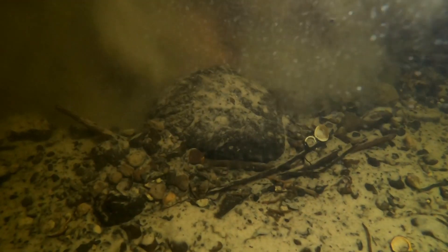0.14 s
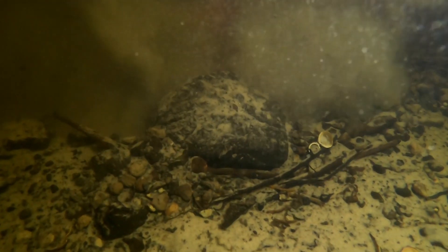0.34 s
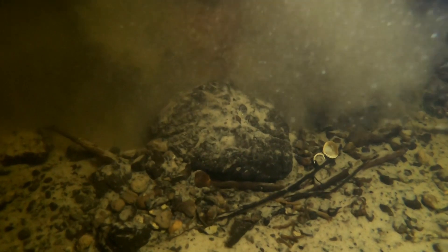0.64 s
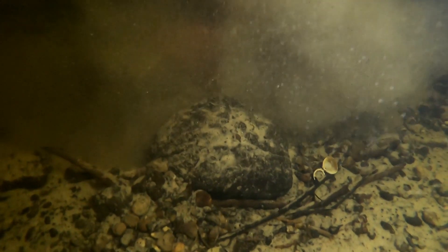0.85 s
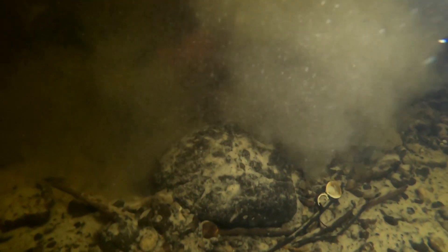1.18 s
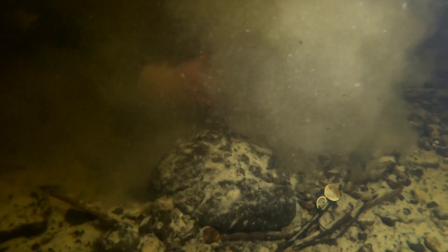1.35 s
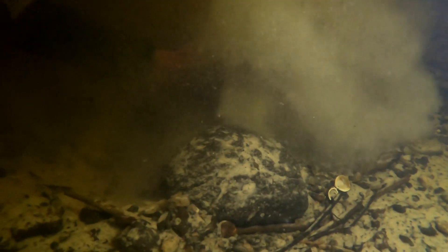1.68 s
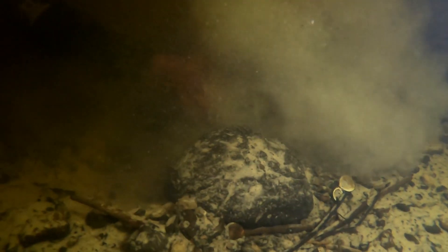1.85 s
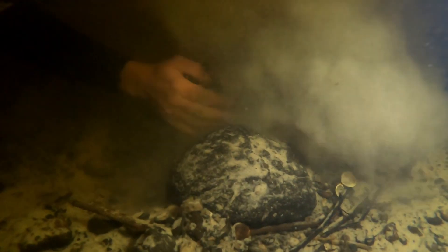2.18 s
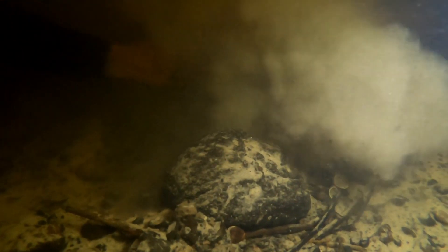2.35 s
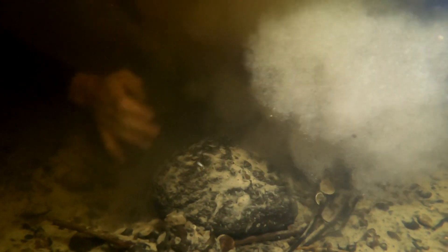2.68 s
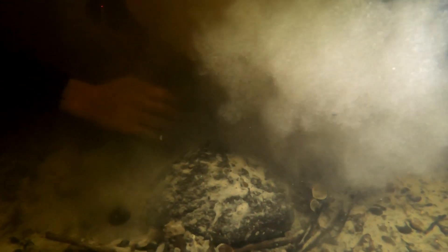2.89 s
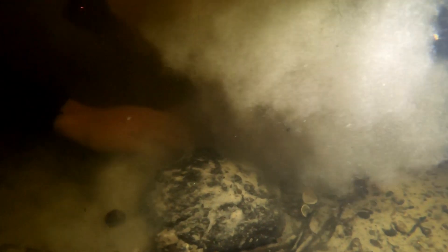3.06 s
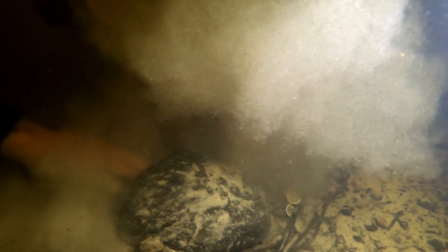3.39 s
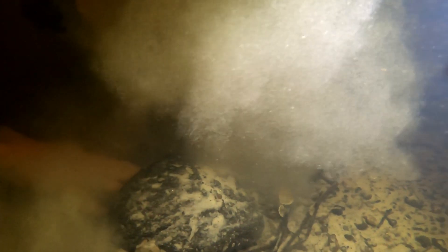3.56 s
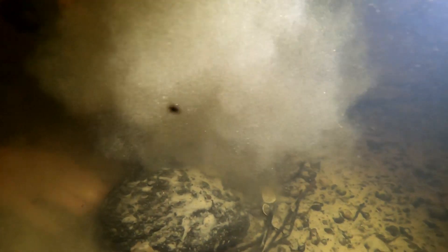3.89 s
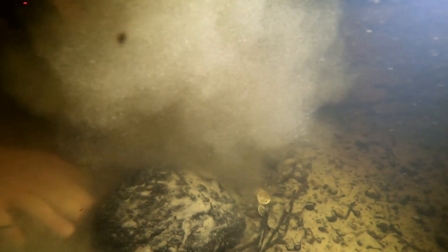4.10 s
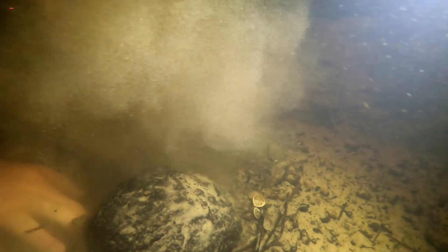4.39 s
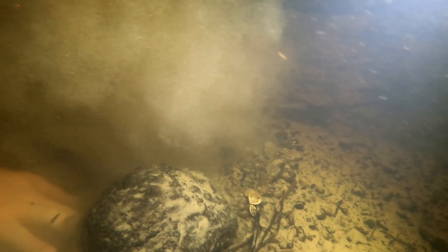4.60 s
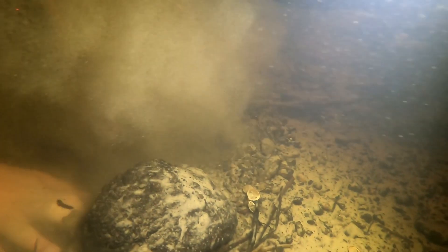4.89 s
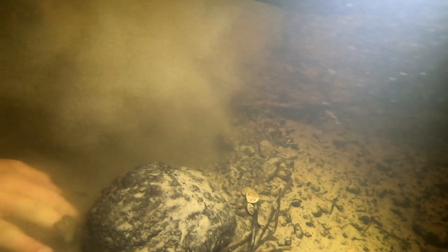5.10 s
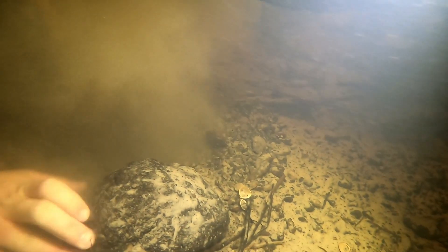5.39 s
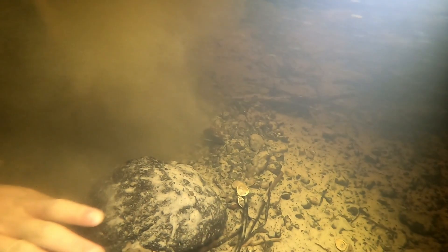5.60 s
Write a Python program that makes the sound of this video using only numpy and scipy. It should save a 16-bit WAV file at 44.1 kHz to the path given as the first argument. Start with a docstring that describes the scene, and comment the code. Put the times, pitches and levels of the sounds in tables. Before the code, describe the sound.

Close underwater sound of a hand digging in river gravel. A low water thump opens it, then busy stone knocks and pattering grit, one heavy clonk near three seconds, and sparser, softer knocks and pebble slides to the end. The microphone sits in a small housing, so everything is hollow and muffled.

```python
"""A low push of water thumps first, then stones knock and grit patters: a hand digs in river gravel
beside a small camera under water. Knocks, grains and sliding gravel are blows of chosen pitch and length
that ring the camera housing; larger stones add decaying notes, and sharp grains add puffs of treble.
Surges and wash are shaped noise, and pushes of water are short low swings.
Two microphone ports hear the housing ring out of step and the low pushes together."""
import sys
import numpy as np
from scipy import signal
from scipy.fft import rfft, irfft, next_fast_len
from scipy.io import wavfile
from scipy.ndimage import uniform_filter1d

SR = 44100
rng = np.random.default_rng(int(sys.argv[2]) if len(sys.argv) > 2 else 0)


def output_pcm(signal):
    """Save a mono or channel-first signal as 16-bit PCM at the path in sys.argv[1].

    Samples are clipped to [-1, 1] before scaling.
    """
    pcm = np.clip(np.atleast_2d(signal).T, -1, 1) * 32767
    wavfile.write(sys.argv[1], SR, np.round(pcm).astype(np.int16))


N = 253134

# Table levels are set before the ports colour the sound.
# stones knocking: (t/s, peak level/dB, centre of the blow f/Hz, contact length/ms, clack over the peak level/dB)
STONE_KNOCKS = [(0.084, -27.5, 1090, 1.3, -8), (0.2, -33, 1430, 1.47, -3), (0.4558, -44, 1640, 0.91, -10),
                (0.466, -32.5, 1490, 0.71, -27), (0.572, -37, 1740, 4.7, 4),
                (0.5868, -32.5, 1530, 0.91, 5.5), (0.6927, -42, 1480, 2.6, 5),
                (0.7914, -26.5, 1180, 1.94, -2), (0.857, -38, 1450, 2, -8), (0.9007, -20, 1460, 2.1, -10),
                (0.9439, -40.5, 1410, 1.6, 12.5), (0.961, -26.5, 1520, 1.14, -9),
                (1.116, -36, 1330, 0.72, 6), (1.125, -49, 1490, 2.6, 2), (1.3055, -29.5, 1300, 0.9, -14),
                (1.318, -39, 1400, 1.4, -5), (1.3218, -30, 1410, 1.4, -6), (1.4967, -37, 1860, 0.8, 8.5),
                (1.523, -32, 1270, 2.2, -17), (1.7272, -37, 1530, 1, 5.5), (1.8521, -31, 1030, 2.2, -15),
                (1.9834, -35, 1250, 0.43, -24), (2.269, -39.5, 1480, 2.1, 1),
                (2.494, -47.5, 1940, 0.83, 16), (2.5096, -27, 1370, 1.37, -3.5),
                (2.572, -39, 1890, 1.5, -2), (2.6065, -38, 1700, 1, -7), (2.615, -22.5, 1420, 0.8, -3.5),
                (2.6164, -27.5, 2100, 0.6, -12), (2.625, -39, 1700, 1.6, 2), (2.646, -27, 1490, 1.3, -4),
                (2.668, -28.5, 1400, 1.1, -4.5), (2.681, -34, 1410, 0.9, -12), (2.792, -43, 1310, 2.2, -19),
                (2.9998, -32, 1300, 2.4, -29), (3.069, -41, 1510, 2, 2.5), (3.15, -34.5, 1580, 0.84, -4),
                (3.259, -32, 1260, 1.1, -12), (3.5667, -37, 1070, 0.74, -23),
                (3.806, -32, 1350, 2.1, -21.5), (3.8175, -36, 1240, 9.6, -16), (3.908, -40, 1400, 2.8, -11),
                (3.941, -23.5, 1420, 1.2, -12), (4.0308, -30.5, 1610, 1.64, -11.5),
                (4.0789, -26.5, 940, 1.6, -39), (4.104, -46.5, 650, 2.7, -26),
                (4.1623, -40, 1350, 0.72, -8), (4.172, -33.5, 1427, 7.1, -20),
                (4.182, -38.5, 1080, 2.4, -3), (4.195, -33.5, 1440, 9.5, -20), (4.372, -49.5, 1380, 1.2, 4),
                (4.3763, -41.5, 1540, 0.84, -2), (4.5963, -44.5, 810, 11, -20), (4.706, -47, 810, 4.1, -28),
                (4.8005, -33, 1460, 3, -10.5), (4.818, -38.5, 1193, 4, -28), (4.937, -39.5, 1470, 5.9, -23),
                (5.105, -36, 1680, 1.86, -13), (5.295, -32.5, 1200, 0.77, -10),
                (5.3133, -36.5, 1306, 2.1, -12), (5.4277, -27, 1300, 0.77, -25),
                (5.4035, -41, 1250, 1.5, -20), (5.4327, -30.5, 900, 2.2, -32), (5.4395, -41, 1240, 6, -11),
                (5.563, -36.5, 1460, 0.75, -7.5), (5.5897, -28, 1540, 1.7, -11.5),
                (5.6543, -30.5, 1460, 1.02, -2)]
# larger stones that sound a note of their own: (t/s, peak level/dB, note f/Hz, length/ms)
STONE_NOTES = [(0.755, -21.5, 1000, 4.6), (0.785, -34, 950, 4.3), (0.8142, -27.5, 1000, 8.3),
               (0.817, -37, 980, 4.5), (0.8275, -36, 960, 2.5), (0.8345, -26.5, 980, 6),
               (1.389, -37, 930, 5.5), (1.3973, -15.5, 900, 7), (1.4055, -22.5, 753, 6.5),
               (1.401, -32.5, 2010, 6.8), (1.411, -29.5, 890, 6), (1.413, -38, 1550, 9),
               (1.427, -36, 880, 4.9), (1.432, -41, 910, 6.9), (3.0015, -12, 880, 3.7),
               (3.0045, -24.5, 943, 4.9), (3.001, -39, 2130, 4.2), (3.662, -46, 866, 14),
               (4.372, -24.5, 807, 6.4), (4.3785, -30, 858, 5.9), (4.3865, -31, 835, 7.6),
               (4.394, -39.5, 850, 7), (4.402, -41, 1310, 12.2), (4.42, -43, 1280, 32),
               (4.427, -45, 787, 6.3), (4.8015, -24, 807, 4.9), (4.7999, -23.5, 1390, 3.83),
               (4.8201, -43, 830, 7.4)]
# sharp grains ticking on the housing: (t/s, peak level/dB, lower edge of the tick f/Hz)
GRAIN_TICKS = [(0.102, -52, 3900), (0.166, -48, 6100), (0.2, -58, 4000), (0.469, -48, 4480),
               (0.573, -44, 5000), (0.5797, -45, 5040), (0.5858, -37, 4200), (0.5933, -46, 8160),
               (0.602, -48, 8000), (0.617, -43, 3970), (0.6925, -47.5, 4520), (0.79, -51, 4060),
               (0.8668, -50, 7000), (0.961, -57, 4500), (1.317, -49, 5000), (1.618, -45, 4370),
               (1.729, -53, 4500), (2.5117, -43.5, 4000), (2.4423, -47, 3600), (2.616, -37.5, 4930),
               (3.934, -54, 3300)]
# steady stirring of the bed: (t/s, shell scrape level/dB, pebbles over it level/dB, fine grit over it level/dB)
BED_STIRRING = [(0, -53.5, 0.5, 3), (0.9, -51.5, -3.5, -2.5), (1.2, -54.5, -4, -4), (1.6, -50, -5.5, -0.5),
                (2.15, -58.5, -2.5, 1.5), (2.8, -55, -1.5, -1.5), (3.15, -58, 2.5, -1.5),
                (3.4, -65.5, 0, -3.5), (3.75, -57.5, 3.5, -13), (4.1, -60, 0, -14.5), (4.5, -70, 2, -14),
                (5.1, -72, 1, -12), (5.45, -67, -1, -6.5), (5.74, -46, -5.5, -17)]
# slips of the bed under the hand:
# (t/s, shell scrape level/dB, time to fall 10 dB/s, pebbles over it level/dB, fine grit over it level/dB)
BED_SLIPS = [(0.205, -52.5, 0.025, 5, 5), (0.336, -47, 0.024, 0, -4.5), (0.582, -45, 0.043, 0, -8),
             (0.824, -63.5, 0.31, 14, 7), (0.945, -51.5, 0.29, -12, -1), (1.137, -46, 0.036, 3.5, 0),
             (1.321, -48.5, 0.096, -7, 3.5), (1.411, -45.5, 0.012, -5, -4), (1.54, -50, 0.054, -0.5, -14),
             (1.608, -55.5, 0.017, -26, 5), (1.762, -50, 0.023, 8, -0.5), (2.503, -64, 0.2, 3.5, 6.5),
             (2.616, -55, 0.046, -13.5, -18), (3.064, -45, 0.12, -18, -24), (3.489, -63.5, 0.094, 8.5, -9),
             (3.821, -42, 0.028, -2, -10), (4.02, -47, 0.029, 1.5, -16.5), (4.179, -39, 0.012, 2.5, -11.5),
             (4.259, -48.5, 0.037, -3, -14.5), (4.418, -61.5, 0.1, 1, -23), (4.518, -61.5, 0.026, 8.5, -22),
             (4.808, -67, 0.02, 18, -18), (4.951, -53, 0.047, -4, -22), (5.199, -54, 0.017, 2.5, -17),
             (5.312, -53.5, 0.085, -1.5, -14.5), (5.436, -58.5, 0.011, -9, -3.5),
             (5.534, -56, 0.037, 5.5, -2.5), (5.74, -51.5, 0.17, -7, -24)]
# housing resonances: (f/Hz, full width at half amplitude/Hz, level/dB)
HOUSING_MODES = [(650, 110, -7), (900, 170, 1), (1470, 270, -1), (2290, 230, -6.5), (3150, 500, -19),
                 (5600, 900, -36), (9100, 450, -48)]
# response of the housing wall between its resonances: (f/Hz, level/dB)
WALL_RESPONSE = [(300, -25), (500, -9), (1150, -3), (2000, -15.5), (2800, -17.5), (4300, -29.5),
                 (7000, -44), (11000, -68.5), (16000, -78.5)]
# phase of the left port against the right: (f/Hz, phase/rad)
LEFT_PHASE = [(100, 0), (340, -.3), (600, -1.8), (860, -2.45), (1210, -3.14), (1640, -3.66), (2240, -4.26),
              (3700, -5.1), (4400, -5.7)]
# housing sound, left port over right: (f/Hz, level/dB)
PORT_TILT = [(300, 8), (550, 3.5), (800, 0.5), (1100, -2), (2300, -0.5), (3200, -1), (4300, -8),
             (6000, -12), (7700, -15.5), (9100, 17), (11000, 10.5)]
# pushes of water on the housing: (t/s, peak level/dB, swing f/Hz)
WATER_THUMPS = [(0.006, -25, 135), (0.023, -32, 155), (0.174, -36, 203), (0.289, -36.5, 139),
                (0.343, -34, 83), (0.357, -27, 121.5), (0.633, -36, 191), (0.709, -37.5, 140),
                (0.904, -33, 248), (0.947, -35, 178), (1.122, -25, 172), (1.146, -22.5, 110),
                (1.506, -34.5, 168), (1.996, -38.5, 164), (2.515, -37.5, 203), (2.618, -34.5, 184),
                (3.474, -37.5, 102.4), (3.693, -43.5, 78.5), (3.835, -38.5, 168), (3.847, -44, 184),
                (3.869, -35.5, 176), (4.043, -33.5, 306), (4.082, -45, 317), (4.108, -34.5, 230),
                (4.134, -47.5, 298), (4.181, -30, 170), (4.202, -33, 124), (4.266, -45, 198),
                (4.377, -35.5, 250), (4.385, -41.5, 265), (4.481, -47, 127), (4.501, -50.5, 178),
                (4.523, -42, 88), (4.635, -49, 264), (4.801, -34.5, 333), (4.804, -34, 127),
                (4.883, -45, 252), (4.944, -40.5, 210), (4.987, -48, 92), (5.107, -45, 270),
                (5.298, -39, 172), (5.364, -40, 122), (5.387, -40, 83), (5.429, -27, 199),
                (5.439, -32, 168), (5.594, -35, 220), (5.66, -35.5, 168)]
# the housing rocks for several swings: (t/s, peak level/dB)
HOUSING_ROCKS = [(0.765, -36), (1.067, -30.5), (1.349, -41), (4.003, -34.5), (4.036, -33)]
# moving water: (t/s, deep surge level/dB)
SURGE_LEVEL = [(0, -39), (0.13, -57), (0.35, -37.5), (0.46, -76), (0.54, -44), (0.93, -59), (1.1, -41.5),
               (1.3, -54), (1.68, -44), (1.98, -55.5), (2.43, -46), (2.54, -67), (2.65, -51), (3.4, -56),
               (3.5, -43.5), (3.63, -65), (3.76, -42.5), (3.87, -58), (4.03, -46.5), (4.27, -45.5),
               (4.43, -85), (4.54, -42.5), (4.62, -74.5), (4.75, -48.5), (5.02, -47), (5.26, -63),
               (5.53, -54), (5.74, -62)]
# wash of water past the ports, before it is broken into gurgles: (t/s, low swirl level/dB, ripple level/dB)
SWIRL_RIPPLE = [(0, -50, -41), (0.13, -60.5, -66), (0.46, -55, -64.5), (0.77, -45.5, -55.5),
                (1.1, -64.5, -52.5), (1.25, -54.5, -56.5), (1.68, -51.5, -55), (1.98, -70, -59),
                (2.65, -61.5, -62.5), (3.4, -71, -63.5), (3.5, -52.5, -54), (3.7, -63.5, -75),
                (3.87, -52, -50.5), (4.12, -58, -59), (4.28, -59.5, -49), (4.43, -69, -77),
                (4.75, -65, -72), (4.92, -66, -59), (5.2, -82, -72), (5.36, -52, -54), (5.47, -69, -64),
                (5.55, -61, -56), (5.74, -52.5, -51.5)]
# spectrum of the moving water: (f/Hz, level/dB)
WATER_SPECTRUM = [(12, -26), (22, -5), (30, 4), (40, -4.5), (55, -6.5), (70, -10.5), (130, -6.5),
                  (220, -10.5), (320, -11.5), (400, -22.5), (500, -40.5), (800, -46.5), (1600, -108)]
# water sound, left port over right: (f/Hz, level/dB)
WATER_PORT_TILT = [(50, -2), (210, 0), (400, 3.5)]
# spectrum of the amplifier hiss: (f/Hz, level/dB)
HISS_SPECTRUM = [(1000, 0), (3000, -10), (6000, -15.5), (10000, -24), (15000, -35)]

DAMPED_S = 0.0071  # silt on the housing stops a knock's ring
SCATTER, SCATTER_S = 0.03, 0.009  # grit shaken loose after a knock: strength, decay in seconds
DETUNE = 0.059  # where a piece lands shifts the housing's ring by up to this share
NOTE_WOBBLE = 0.2  # the grinding contact makes the note uneven
TICK_TOP_HZ = 10600  # upper edge of every tick
SLIP_RISE = 0.83  # rise of a slip as a share of its fall
SLIP_RIPPLE_DB = -5  # a slip of pebbles ripples the water too
SWINGS = 0.99  # a push lasts about this many of its swings
ROCK_HZ, ROCK_SWINGS = 108.5, 2.9  # pitch and length of a rock, in swings
HISS_DB, EDGE_HZ = -79.5, 15600  # hiss level, top of the band


def knocks():
    """Each blow is a first contact, a brief grind and a scatter of grit; hard edges add a clack."""
    out = np.zeros(N)
    t = np.arange(2048) / SR
    chance = rng.standard_normal((len(STONE_KNOCKS), 2, 2048))
    places = 2 * rng.random(len(STONE_KNOCKS)) - 1
    damped = np.exp(-(t / DAMPED_S) ** 2)
    clack_ring = damped * ring(1800, 3000, steep=8.14)
    for (s, db, hz, ms, clack_db), (noise, grit), place in zip(STONE_KNOCKS, chance, places):
        grind = 0.17 * noise * np.exp(-(t * 1000 / np.maximum(ms - 1.6, .1)) ** 4)
        scatter = SCATTER * grit * (abs(grit) > 2.5) * np.exp(-t / SCATTER_S)
        force = signal.unit_impulse(2048) + grind + scatter
        spread = 1 / np.maximum(ms, 1)  # a longer contact wakes fewer resonances
        lo_hz = hz / (0.86 + 1.15 * spread)
        hi_hz = hz * (1.104 + 0.46 * spread)
        body_ring = damped * ring(lo_hz, hi_hz, steep=9.6, detune=DETUNE * place)
        body = signal.fftconvolve(force, body_ring)
        clack = signal.fftconvolve(force, clack_ring)
        add(out, s, gain_of(db) * peaked(body))
        add(out, s, gain_of(db + clack_db) * peaked(clack))
    return out


def notes():
    """A stone's own note swells through the contact and the silt soon smothers it."""
    out, t = np.zeros(N), np.arange(2000) / SR
    chance = rng.standard_normal((len(STONE_NOTES), 2, 2000))
    for (s, db, hz, ms), noise in zip(STONE_NOTES, chance):
        u = t * 2400 / ms  # reaches 2.4 at the note's length
        smooth = signal.fftconvolve(noise, np.blackman(200)[None], "same")
        level_wobble, phase_wobble = NOTE_WOBBLE * evened(smooth)
        swell = u ** 2 * np.exp(-1.6 * u ** 1.37)
        note = swell * (1 + level_wobble) * np.sin(2 * np.pi * hz * t + phase_wobble)
        add(out, s, gain_of(db) * peaked(note))
    return out


def ticks():
    """A sharp grain gives a puff of treble that dies away in a couple of milliseconds."""
    out, t = np.zeros(N), np.arange(600) / SR
    for (s, db, hz), noise in zip(GRAIN_TICKS, rng.standard_normal((len(GRAIN_TICKS), 600))):
        puff = noise * np.exp(-t / 0.0016)
        tick = np.convolve(puff, ring(hz, TICK_TOP_HZ, steep=4.0, size=1024))
        add(out, s, gain_of(db) * peaked(tick))
    return out


def gravel(rattle, scrape, grit):
    """Pebbles rattle low, shells scrape, grit patters; sand ticks near each port on its own."""
    slips = clumps()  # one slip of the bed moves all sizes at once
    pebbles = heap([420, 607, 714, 830, 990, 1110], 160, 4.2, slips)
    shells = heap([1300, 1390, 1420, 1710], 200, 3.14, slips)
    grains = heap([1900, 2030, 2120, 2350, 2280], 350, 3.3, slips)
    chips = heap([2900, 3500, 4200], 700, 3.5, slips)
    sand = np.array([heap([5000, 6500, 9000], 3300, 1.7, slips) for _ in range(2)])
    # hard edges click across the middle resonances
    flints = evened(signal.oaconvolve(patter(70, 4.0), ring(1100, 4500, steep=4.2))[:N])
    brisk = grit * (grit / gain_of(-47.0)) ** 0.22  # brisk stirring lifts the finest pieces most
    shared = rattle * pebbles + scrape * shells + grit * grains
    shared = shared + gain_of(-7.5) * brisk * flints + gain_of(-11.0) * brisk * chips
    return shared, gain_of(-24.5) * brisk * sand


def heap(sizes_hz, per_s, spread_db, slips):
    """Pieces of several sizes, each striking with its force around its own frequency."""
    swell = gain_of(2.1 * slips + 1.0 * clumps())
    total = np.zeros(N)
    for hz in sizes_hz:
        contacts = patter(per_s, spread_db) * swell
        detune = DETUNE * (2 * rng.random() - 1)
        piece_ring = ring(0.94 * hz, 1.13 * hz, steep=8.84, detune=detune)
        total += signal.oaconvolve(contacts, piece_ring)[:N]
    return evened(total)


def patter(per_s, spread_db):
    """Random contacts of uneven size."""
    size = gain_of(spread_db * np.minimum(rng.exponential(1, N), 5))
    return size * (rng.random(N) < per_s / SR) * rng.choice([-1., 1.], N)


def clumps():
    """A random swell that gathers contacts into clumps of about ten milliseconds."""
    return evened(uniform_filter1d(uniform_filter1d(rng.standard_normal(N), 400), 400))


def stirring():
    """Levels of pebbles, shells and grit: the steady stirring plus every slip."""
    level, pebbles, grit = curves(BED_STIRRING)
    t = np.arange(N) / SR
    power = (level * np.array([pebbles, np.ones(N), grit])) ** 2
    for s, db, fall, pebble_db, grit_db in BED_SLIPS:
        slip = gain_of(db - 10 * np.maximum((t - s) / fall, (s - t) / (SLIP_RISE * fall)))
        power = power + np.outer(gain_of([pebble_db, 0, grit_db]) ** 2, slip ** 2)
    return np.sqrt(power)


def ring(lo_hz, hi_hz, steep, size=4096, detune=0):
    """Causal response of the housing to a blow with its force between two frequencies."""
    hz = abs(np.fft.fftfreq(size, 1 / SR)) + 1
    power = gain_of(2 * read(WALL_RESPONSE, hz))
    for f, width, db in HOUSING_MODES:
        power = power + gain_of(2 * db) / (1 + (2 * (hz - f * (1 + detune)) / width) ** 2) ** 2
    power = power / (1 + (lo_hz / hz) ** steep) / (1 + (hz / hi_hz) ** steep)
    log_gain = np.log(power + 1e-14) / 2
    phase = -signal.hilbert(log_gain).imag  # minimum phase: the ring starts at the blow
    return np.fft.ifft(np.exp(log_gain + 1j * phase)).real[:size // 2]


def ports(shared, apart):
    """The housing bends between the ports, so the left one lags and each has its own colour."""
    size = next_fast_len(N + 4096)
    hz = np.fft.rfftfreq(size, 1 / SR)
    tilt = gain_of(np.outer([.5, -.5], read(PORT_TILT, hz)))
    turn = np.array([np.exp(1j * read(LEFT_PHASE, hz)), np.ones(len(hz))])
    return irfft(tilt * (turn * rfft(shared, size) + rfft(apart, size)), size)[:, :N]


def water(rattle):
    """Slow surges, a lumpy wash and single pushes press on both ports, with eddies between them."""
    (surge,), (swirl, ripple) = curves(SURGE_LEVEL), curves(SWIRL_RIPPLE)
    swirl = swirl * lumps()
    ripple = np.hypot(ripple, gain_of(SLIP_RIPPLE_DB) * rattle) * lumps()

    def moving():
        deep = surge * coloured(WATER_SPECTRUM, hi_hz=62.0)
        return deep + swirl * coloured(WATER_SPECTRUM, 26, 210) + ripple * coloured(WATER_SPECTRUM, 170)

    common, eddies = moving(), moving()
    thumps(common)
    hz = np.fft.rfftfreq(N, 1 / SR)
    tilt = gain_of(np.outer([.5, -.5], read(WATER_PORT_TILT, hz)))
    return irfft(tilt * rfft(common), N) + gain_of(-13.5) * eddies * [[1], [-1]]  # eddies oppose at the ports


def thumps(mix):
    """A push of water, or a rock of the housing, is a low swing that rises quickly and fades."""
    pushes = [row + (SWINGS,) for row in WATER_THUMPS]
    pushes += [row + (ROCK_HZ, ROCK_SWINGS) for row in HOUSING_ROCKS]
    for (s, db, hz, swings), turn in zip(pushes, rng.random(len(pushes))):
        u = np.arange(0, 5, hz / swings / SR)  # time in lengths of the push
        swell = u ** 1.085 * np.tanh((u / .08) ** 2) * np.exp(-3. * u)
        push = swell * np.sin(2 * np.pi * (swings * u + turn))
        add(mix, s, gain_of(db) * peaked(push))


def lumps():
    """A random swell that breaks the wash into gurgles."""
    return gain_of(4.03 * evened(uniform_filter1d(uniform_filter1d(rng.standard_normal(N), 800), 800)))


def coloured(points, lo_hz=0, hi_hz=30000):
    """Noise with a given spectrum, kept between two frequencies, at rms 1."""
    hz = np.fft.rfftfreq(N, 1 / SR) + 1
    slopes = np.sqrt((1 + (lo_hz / hz) ** 6) * (1 + (hz / hi_hz) ** 6))
    return evened(irfft(rfft(rng.standard_normal(N)) * gain_of(read(points, hz)) / slopes, N))


def gain_of(db):
    """Decibels to a factor."""
    return 10 ** (np.asarray(db) / 20)


def evened(x):
    """Scales to rms 1."""
    return x / np.sqrt(np.mean(x ** 2) + 1e-20)


def peaked(x):
    """Scales to peak 1."""
    return x / abs(x).max()


def read(points, hz):
    """Reads a spectrum table on a log-frequency axis."""
    f, value = np.transpose(points)
    return np.interp(np.log(hz + 1), np.log(f + 1), value)


def curves(rows):
    """Every level column of a table as a gain per sample."""
    s, *columns = np.transpose(rows)
    return [gain_of(np.interp(np.arange(N) / SR, s, c)) for c in columns]


def add(mix, s, sound):
    """Adds a sound so that its strongest moment falls at s."""
    at = round(s * SR) - np.argmax(abs(signal.hilbert(sound)))
    sound = sound[max(-at, 0):]
    part = mix[max(at, 0):][:len(sound)]
    part += sound[:len(part)]


def scene():
    """Stones and gravel heard through the housing, water pressing on it."""
    rattle, scrape, grit = stirring()
    shared, apart = gravel(rattle, scrape, grit)
    return ports(shared + knocks() + notes() + ticks(), apart) + water(rattle)


def record(dry):
    """Faint amplifier hiss, separate in each channel, then the band limit."""
    hiss = np.array([coloured(HISS_SPECTRUM, 450), coloured(HISS_SPECTRUM, 460)])
    noisy = dry + gain_of(HISS_DB) * hiss
    band = signal.firwin(511, EDGE_HZ, window=("kaiser", 9), fs=SR)
    return signal.oaconvolve(noisy, band[None], "same")


dry = scene()
out = record(dry)
output_pcm(out)
```